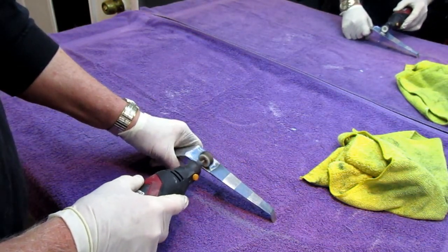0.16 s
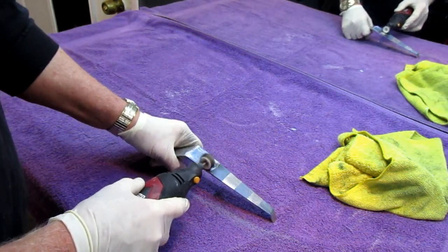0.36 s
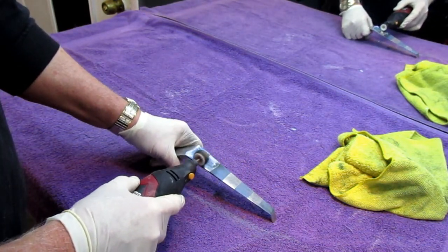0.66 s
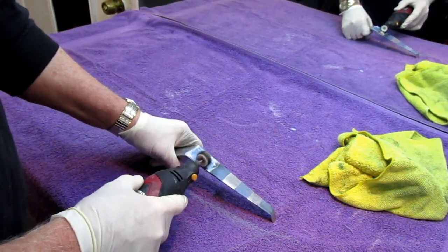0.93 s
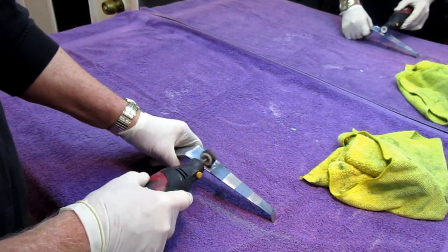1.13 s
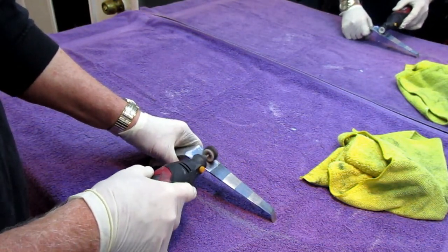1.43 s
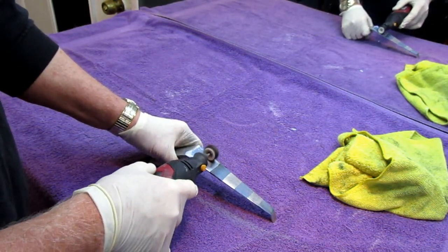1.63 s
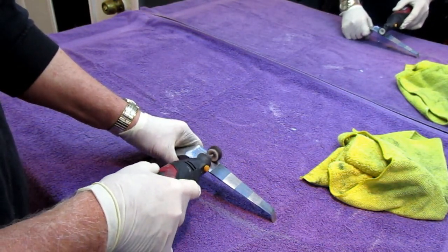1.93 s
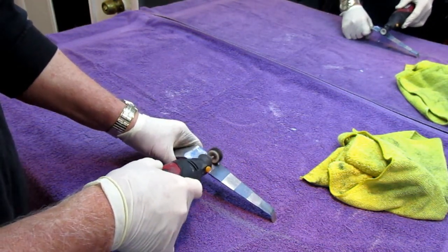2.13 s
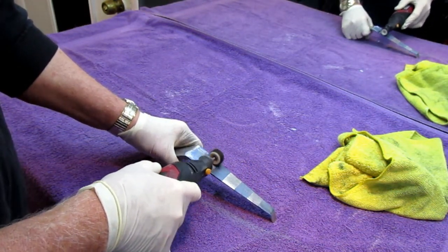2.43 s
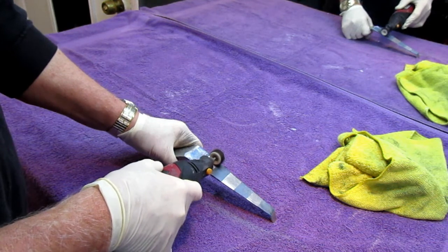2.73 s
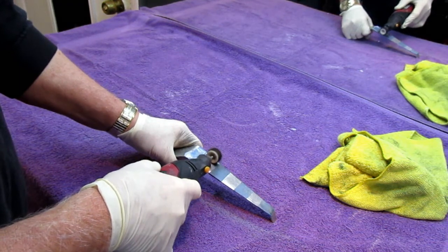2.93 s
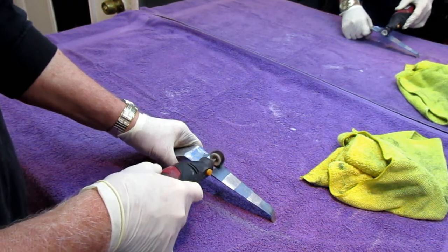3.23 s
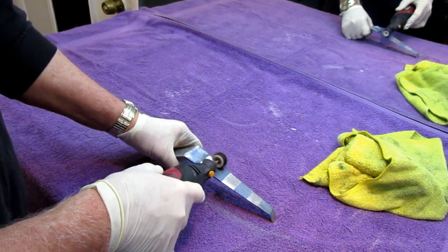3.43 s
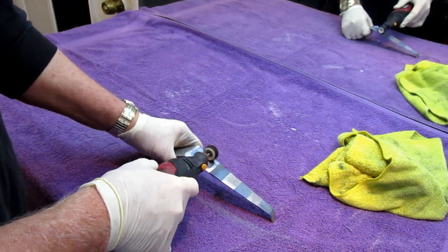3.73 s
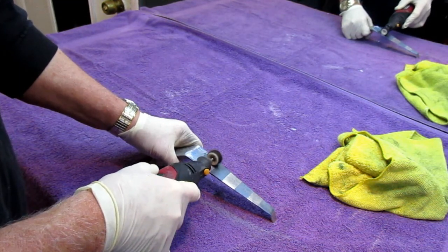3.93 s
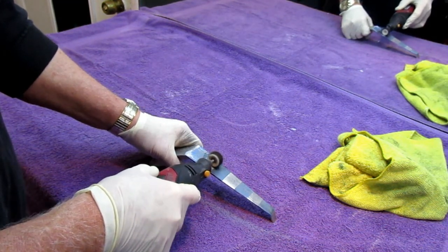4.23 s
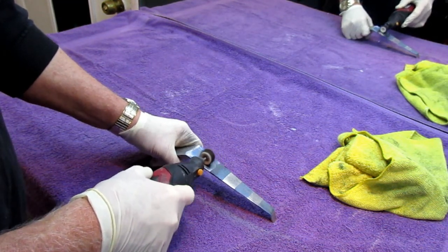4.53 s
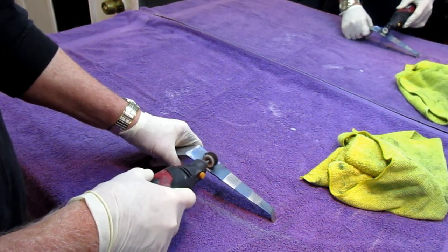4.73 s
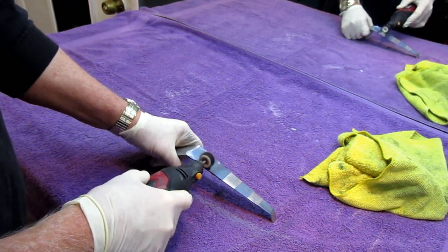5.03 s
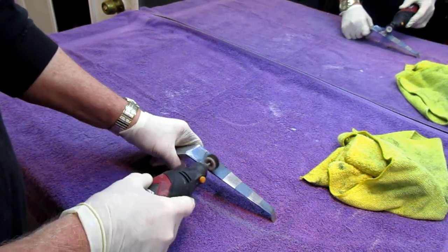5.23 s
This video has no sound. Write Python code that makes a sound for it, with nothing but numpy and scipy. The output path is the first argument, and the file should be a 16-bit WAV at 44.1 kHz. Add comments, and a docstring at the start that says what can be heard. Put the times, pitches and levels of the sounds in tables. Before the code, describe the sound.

A small handheld rotary tool whines steadily against a metal strip, growing louder and rougher, with quick pitch dips as each stroke presses in.

```python
"""Rotary tool buffing metal

A handheld rotary tool buffs a strip of metal on a towel-covered bench, close to a mono microphone.
Each of the hand's strokes, five or six a second, brakes the shaft. The slap of the bit once a turn and its
bounce every other turn are sums of sines locked to the running shaft phase; mains ripple adds a hum, and weak
lines lie near a few orders of the whine. Felt and fan hiss are coloured noise; the bench booms, rumbles and
knocks softly."""
import sys
import numpy as np
from scipy.fft import rfft, irfft, next_fast_len
from scipy.io import wavfile
from scipy.ndimage import uniform_filter1d, map_coordinates

SR = 44100
rng = np.random.default_rng(int(sys.argv[2]) if len(sys.argv) > 2 else 0)


def generate_wav(sig):
    """Save sig (samples, or channels by samples) to the path in sys.argv[1] as 16-bit PCM at SR."""
    pcm = np.round(np.clip(np.atleast_2d(sig).T, -1, 1) * 32767).astype(np.int16)
    wavfile.write(sys.argv[1], SR, pcm)


N = 236623
T = np.arange(N) / SR  # time in s
RIPPLE_HZ = 120  # mains ripple in the motor torque
TOP_HZ = 15100  # upper band limit
FULL_DB = -17  # the work counts as light below this level
SAG_SPREAD_S = 0.047  # spread of the bell-shaped speed sag
BITE_LEAD_S, BITE_SPREAD_S = 0.053, 0.026  # the bite comes before the deepest sag
HUM_DB, HUM_GROWTH = -43, -0.4  # dB against the work; dB gained per dB under FULL_DB
FELT_DB = -6  # against the work
BOOM_DB = -49  # steady shaking of the bench against the work, before the trims of its tone and noise
THUD_RISE_S, THUD_T60_S = 0.022, 0.47

# shaft speed between strokes, as the hand leans harder: start_s, speed_hz
SHAFT_DRIFT = [(0.0, 433.4), (0.5, 417.0), (0.7, 417), (1.05, 409.1), (1.45, 405.2), (1.7, 417.4),
               (1.8, 427.2), (1.95, 429), (2.05, 424.7), (2.38, 421.2), (2.55, 413), (3.05, 414.5),
               (3.5, 406.4), (4.25, 402.3), (4.65, 386.3), (5.17, 379.6), (5.29, 397.5), (5.37, 417.4)]
# each stroke bites, then brakes the shaft briefly: centre_s, sag_hz, bite_db
STROKES = [(0.129, 1.45, 0.3), (0.285, 1.8, 1), (0.488, 3.85, 0.5), (0.74, 1.1, -0.5), (0.84, 1.78, -0.7),
           (1.058, 5.1, -0.7), (1.282, 3.2, -1), (1.485, 1.58, 0.5), (1.62, 7.8, 1), (1.727, 11.5, -1),
           (1.845, 11.9, -1.1), (2.088, 2.36, -0.1), (2.271, 2.16, 0.7), (2.668, 1.69, 1),
           (2.822, 2.93, 0.8), (2.973, 4, 0.5), (3.133, 5.5, 0.4), (3.326, 5.9, 0), (3.5, 9.7, -0.5),
           (3.665, 7.1, 0), (3.869, 9.1, -1), (4.029, 9.8, -0.3), (4.178, 8.9, 0.5), (4.337, 11, 1.2),
           (4.524, 8.5, -0.1), (4.683, 7.6, 1.4), (4.845, 8.6, -1), (5.022, 5.56, -1), (5.204, 9.4, -0.3)]
# loudness of the work, which the layers of the tool follow: start_s, level_db, fan_db (against the work)
WORK_LEVEL = [(0.0, -26, -11.5), (0.35, -25.5, -8), (0.7, -22.5, -10.5), (0.9, -22, -9.5),
              (1.3, -19.5, -10.9), (1.6, -19.5, -11), (1.8, -16.5, -11.5), (2.1, -17.5, -11),
              (2.5, -15.5, -11), (3.05, -15.5, -10.5), (3.2, -17.5, -10), (3.7, -16, -9), (4.3, -16, -10),
              (4.9, -15.5, -11), (5.15, -14.5, -10), (5.37, -17.5, -9)]
# the bit leaves the metal: start_s, length_s, level_db
LIFTS = [(1.721, 0.06, -3), (1.887, 0.051, -6.5), (5.224, 0.05, -7)]
# the bit is off the metal and the orders from the ninth to the twenty-fourth fade: start_s, end_s, level_db
UPPER_FADES = [(1.725, 1.935, -7), (5.225, 5.4, -9)]

# a hand or the strip presses the table top: start_s, level_db (before the rise and the trims)
THUDS = [(.02, -57), (.76, -52), (.97, -56), (1.5, -62), (1.72, -54), (1.87, -45), (1.97, -56), (2.13, -46),
         (2.65, -43), (2.92, -59), (3.21, -53), (3.39, -47), (3.8, -57), (4.05, -55)]
# low rumble of the bench: start_s, level_db (mean of a random wobble)
RUMBLE = [(0, -70), (1.3, -68), (1.5, -59), (2.0, -57), (2.3, -63), (3.3, -68), (3.5, -59), (5.0, -60),
          (5.37, -57)]
# the strip shifts on the towel: start_s, level_db (of each of two tones)
KNOCKS = [(1.718, -41), (1.87, -42.5)]

# relative spectrum of the felt rub through strip and housing: frequency_hz, density_db (per Hz)
FELT_SPECTRUM = [(100, -32), (180, -30), (340, -15.5), (540, -14), (740, -4.5), (950, -9), (1200, -3),
                 (1370, -6), (1600, -2), (1900, 1.5), (2220, -4), (2900, -0.5), (3600, -8), (4300, -6),
                 (6500, -12.5), (12000, -66)]
# relative spectrum of the fan: frequency_hz, density_db (per Hz)
FAN_SPECTRUM = [(2350, -19), (4000, 0), (9450, -5), (11400, -13.5), (13200, -17.5), (14900, -22.5)]

# shaft speeds at which the bounce lines are mapped: speed_hz
BOUNCE_SPEEDS = (380, 396, 406, 414, 428)
# main lines of the every-other-turn bounce: order, five level_db (against the work, at BOUNCE_SPEEDS),
# growth (dB gained per dB under FULL_DB)
BOUNCE_LINES = [(0.5, -36.5, -37.0, -32.5, -32.5, -34.0, 0.58), (1.5, -26.5, -27, -21.5, -21.5, -35, 0.23),
                (2.5, -36, -39, -29, -28, -27.0, 0.17), (3.5, -27, -17.5, -22, -21.5, -22.5, 0.66),
                (4.5, -25.0, -18, -18.5, -19.5, -4.5, -0.28), (5.5, -31, -32, -35.5, -21, -16.5, 0.46),
                (6.5, -27, -29, -22, -17, -7, -0.44), (7.5, -17, -16, -25, -27, -17.0, -0.88)]
# other lines of the bounce: order, level_db (against the work)
OTHER_BOUNCE_LINES = [(8.5, -25), (14.5, -27)]
# strength of the bounce: start_s, level_db
BOUNCE_STRENGTH = [(0, -1), (1.5, 0), (1.57, -10), (1.63, -0.5), (1.72, 0), (1.78, -20), (2.15, -11),
                   (2.3, -11), (2.6, 0), (3.03, 0), (3.09, -14), (3.15, 0.5), (4.5, -0.5), (5.2, -2),
                   (5.26, -13), (5.37, -20)]
# ripple line one ripple step below the eighth order: columns as BOUNCE_LINES
RIPPLE_BELOW = (8, -11, -16, -13, -26, -37, -6.3)
# weak lines near the eighth, sixteenth and thirty-second orders, most set off by mains ripple:
# order, ripple_steps (of RIPPLE_HZ), level_db (against the work)
WEAK_LINES = [(8.02, -2, -21.5), (8.1, 1, -29), (15.5, 0.52, -32), (32, -1, -42), (32, 1, -43)]

# shaft speeds at which the orders are mapped: speed_hz
ORDER_SPEEDS = (376, 388, 398, 406, 414, 428)
# strip and housing favour each order at some speeds: order, six level_db (against the work, at ORDER_SPEEDS,
# before a trim per group), stroke_db (per Hz of sag about its mean), pull_db (at full speeding up),
# first_db and second_db (at unit first and second shift of colour)
SHAFT_ORDERS = [(1.0, -21, -21, -20, -15.0, -19.5, -11.5, 0.063, -0.6, 1, 0.0),
                (2.0, -18, -15, -16, -13, -15.5, -15.5, -0.21, 0.1, 0.7, 1.0),
                (3.0, -15.5, -22, -15.5, -22.5, -19.5, -19.5, -0.2, 0.5, -2, 8),
                (4.0, -15, -20.5, -10, -8.5, -9.5, -18.5, -0.084, -2, 1.8, 0.3),
                (5.0, -19.5, -13, -21, -15.5, -15.5, -16, 0.26, 0, -3, 1.5),
                (6.0, -13.5, -12.5, -18, -9, -10, -21, 0.17, 0.1, 7, 4.0),
                (7.0, -11.5, -10, -11.5, -12, -23, -16, -0.3, -2, -1.5, 1),
                (8.0, -14, -15.5, -12.5, -14.5, -16, -14.5, -0.035, -2.5, -5.5, -0.3),
                (9.0, -17, -21, -18.5, -24, -23.7, -26, -0.1, 0, 3, 1.6),
                (10.0, -31, -21, -17, -18, -19.5, -25, -0.03, -1, -5, 4),
                (11.0, -25.0, -15.5, -15.5, -18, -22, -22, -0.14, -1.3, 1.5, 1),
                (12.0, -30, -26, -20, -18, -29, -23, 0.17, 0.5, -8, 3.5),
                (13.0, -27.4, -38, -22, -20, -22.2, -25, 0.048, 2, 0.4, 1.7),
                (14.0, -31, -22.2, -37, -27, -18, -33, -0.35, 4, 5, 6),
                (15.0, -19.5, -15, -22.5, -22, -24, -26, 0.064, 1.5, -6, 1.5),
                (16.0, -20, -21, -21, -22.8, -20.5, -26, 0.2, -0.5, 3.5, -1.5),
                (17.0, -26, -21.5, -20.5, -22.7, -29, -22, 0.0, 4, -7, -2.5),
                (18.0, -36, -27.0, -33.9, -28, -28.5, -29, -0.0, -7.5, -0.7, 3.2),
                (24.0, -25, -19.5, -24, -30, -27.5, -28.1, 0.037, 1, 1, -4),
                (31.0, -43, -44.7, -48.5, -40.0, -41.2, -51.2, -0.1, -1.1, -3.7, 4.0),
                (32.0, -36.6, -42.5, -39.5, -36, -45.3, -52.7, 0.1, 2, -0.3, 3.9)]
# faint upper orders: order, level_db (against the fan level of WORK_LEVEL)
FAINT_ORDERS = [(19, -25), (20, -29), (21, -39), (22, -31), (23, -25), (25, -26), (26, -32), (27, -38),
                (28, -40), (30, -33), (33, -40)]
# the whine changes colour in two ways, likely as the tool is tilted and moved along the strip:
# start_s, first, second (both about -1 to 1, no unit)
COLOUR_SHIFT = [(0.0, 1.0, 0.29), (0.2, 0.78, 0.42), (0.45, 0.37, -0.12), (0.65, 0.4, -0.49),
                (0.85, 0.66, -1.1), (1.05, 0.42, -0.98), (1.35, 0.02, -0.74), (1.6, 0.23, 0.26),
                (1.72, -0.062, 0.39), (1.8, -0.95, -0.22), (1.97, -0.61, 0.26), (2.3, -0.42, -0.022),
                (2.55, -0.46, 0.18), (3.1, -0.37, 0.47), (3.5, 0.096, 0.38), (4.2, 0.066, 0.38),
                (4.6, -0.25, 0.35), (4.9, -0.2, -0.048), (5.2, -0.45, -0.2), (5.37, -0.79, -0.64)]
# the first order breaks up while the touch is light, then firms: start_s, level_db (added to its row)
FIRST_ORDER = [(0, -9), (.2, -7.5), (.27, -23), (.33, -2), (.4, -12), (.47, 3), (.56, -16), (.75, -12),
               (.82, -1), (1.05, 0), (1.7, 0), (2.0, 2.5), (5.1, 0), (5.2, 5), (5.37, 4.5)]


def amp(db):
    """Decibel law: 20 dB is a factor of ten in amplitude."""
    return 10 ** (np.asarray(db) / 20)


def unit(x):
    """Normalisation to an rms of 1."""
    return x / np.sqrt(np.mean(x ** 2) + 1e-20)


def curves(rows):
    """Linear interpolation: one value per sample for each column after the time."""
    s, *cols = np.transpose(rows)
    return [np.interp(T, s, c) for c in cols]


def wobble(rate):
    """Smooth random fluctuation: a spline through random knots, rate knots a second."""
    coarse = T[::32]
    knots = rng.standard_normal(int(N * rate / SR) + 4)
    return np.interp(T, coarse, map_coordinates(knots, [coarse * rate]))


def bumps(times, heights, width_s):
    """Superposition of bell-shaped swells."""
    coarse = T[::32]
    bells = np.exp(-0.5 * ((coarse - times[:, None]) / width_s) ** 2)
    return np.interp(T, coarse, heights @ bells)


def filtered(x, response):
    """Linear filtering: the spectrum is multiplied by a response of frequency."""
    m = next_fast_len(N + SR // 2)
    return irfft(rfft(x, m) * response(np.fft.rfftfreq(m, 1 / SR)), m)[..., :N]


def coloured(x, spectrum):
    """Spectral shaping by points in Hz and dB, joined on a log frequency axis; rms 1."""
    f, db = np.transpose(spectrum)
    return unit(filtered(x, lambda hz: amp(np.interp(np.log(hz + 1), np.log(f + 1), db))))


def tone(turns, blur):
    """Phase modulation: a sine of rms 1 on a running phase, with blur rad of slow unrest."""
    return np.sqrt(2) * np.sin(2 * np.pi * (turns + rng.random()) + blur * wobble(40))


def drift():
    """Mean load sets the shaft speed in Hz between strokes."""
    return curves(SHAFT_DRIFT)[0]


def sag():
    """Friction brakes the shaft: Hz lost to the strokes."""
    s, hz, _ = np.transpose(STROKES)
    return bumps(s, hz, SAG_SPREAD_S)


def work():
    """Contact force sets the level: work in dB with each bite, and dB under full without it."""
    work_db = curves(WORK_LEVEL)[0]
    s, _, bite_db = np.transpose(STROKES)
    light_db = np.clip(FULL_DB - work_db, 0, None)
    return work_db + bumps(s - BITE_LEAD_S, bite_db, BITE_SPREAD_S), light_db


def contact():
    """Loss of contact lowers the slap: dB change while the bit is off the metal."""
    lifted_db = sum(db * (T > s) * (T < s + length) for s, length, db in LIFTS)
    return uniform_filter1d(lifted_db, size=300)


def upper_fade():
    """Loss of contact dulls the tone: dB change of the ninth to twenty-fourth orders, bit off the metal."""
    fade_db = sum(db * (T > start) * (T < end) for start, end, db in UPPER_FADES)
    return uniform_filter1d(fade_db, size=400)


def line_db(row, work_db, light_db):
    """Resonance makes the level of a line depend on shaft speed as well as on the work."""
    return work_db + np.interp(drift(), BOUNCE_SPEEDS, row[1:6]) + row[6] * light_db


def bench():
    """Forced and decaying vibration: the table top booms and rumbles; shifts of the strip knock dully."""
    work_db, _ = work()
    thuds, knocks = np.array(THUDS), np.array(KNOCKS)
    since = np.clip(T - thuds[:, :1], 0, None)
    decay = amp(thuds[:, 1:] - 60 * since / THUD_T60_S)
    rise = 1 - np.exp(-since / THUD_RISE_S)
    boom = amp(work_db + BOOM_DB) + (decay * rise).sum(axis=0)
    boom_tone = boom * amp(-0.5) * tone(48 * T, blur=0.65)
    low_spectrum = [(12, -36), (28, -20), (50, 4), (70, -25)]  # Hz, dB
    boom_noise = boom * amp(1) * coloured(rng.standard_normal(N), low_spectrum)

    rumble_spectrum = [(50, -30), (68, 5), (100, -8), (150, -2), (200, -44)]  # Hz, dB
    rumble_gain = amp(curves(RUMBLE)[0] + 1.5 * wobble(3.9))
    rumble = rumble_gain * coloured(rng.standard_normal(N), rumble_spectrum)

    after = T - knocks[:, :1]
    dying = amp(knocks[:, 1:] - 60 * np.abs(after) / 0.17) * (after > 0)  # 60 dB in 0.17 s
    knock = tone(235 * T, blur=0.89) + tone(290 * T, blur=0.81)
    return boom_tone + boom_noise + rumble + dying.sum(axis=0) * knock


def hiss(turns, pull):
    """Broadband noise modulated by rotation: felt and fan swell once a turn; the top flickers on its own."""
    work_db, _ = work()
    beat = np.cos(2 * np.pi * turns)
    felt_source = (1 + 0.28 * beat) * amp(0.63 * wobble(20)) * rng.standard_normal(N)
    felt = coloured(felt_source, FELT_SPECTRUM)
    fan_source = (1 + 0.19 * beat) * amp(0.65 * wobble(14)) * rng.standard_normal(N)
    fan = coloured(fan_source, FAN_SPECTRUM)
    top = filtered(fan, lambda hz: 1 / (1 + (11500 / (hz + 1)) ** 12))
    flicker = amp(1.8 * wobble(11)) - 1
    felt_db = work_db + FELT_DB - 0.5 * pull + 0.11 * contact()
    fan_db = work_db + curves(WORK_LEVEL)[1] - 0.37 * pull + 0.18 * contact()
    return amp(felt_db) * felt + amp(fan_db) * (fan + flicker * top)


def bounce(turns):
    """Period doubling: a bounce every other turn puts lines halfway between the shaft orders."""
    work_db, light_db = work()
    bounce_db, = curves(BOUNCE_STRENGTH)
    lines = 0
    for row in BOUNCE_LINES:
        level_db = bounce_db + line_db(row, work_db, light_db) + 1.4 * wobble(12)
        order = round(2 * row[0]) / 2  # an exact half keeps the line locked to the shaft
        lines = lines + amp(level_db) * tone(order * turns, blur=0.25 * row[0] ** 0.3)
    for order, db in OTHER_BOUNCE_LINES:
        level_db = bounce_db + work_db + db + 1.7 * wobble(13.0)
        lines = lines + amp(level_db) * tone(order * turns, blur=0.37)
    return lines


def hum_and_weak_lines(turns, pull):
    """Torque modulation: mains ripple gives a hum and sets off most of the weak lines near a few orders."""
    work_db, light_db = work()
    below_db = line_db(RIPPLE_BELOW, work_db, light_db) + 1.5 * wobble(12)
    below = amp(below_db) * tone(8 * turns - RIPPLE_HZ * T, blur=0.2)
    weak = sum(amp(work_db + db + 3.5 * wobble(6)) * tone(order * turns + step * RIPPLE_HZ * T, blur=0.45)
               for order, step, db in WEAK_LINES)
    hum_db = work_db + HUM_DB + HUM_GROWTH * light_db
    hum = amp(hum_db + 1.8 * pull + 2.2 * wobble(9.9)) * tone(RIPPLE_HZ * T, blur=0.1)
    overtone = amp(hum_db - 2 + 2.5 * wobble(8.6)) * tone(2 * RIPPLE_HZ * T, blur=0.1)
    return below + weak + hum + overtone


def whine(turns, pull):
    """Harmonics of rotation: shaft orders follow strokes and colour shifts; the faint ones come and go."""
    work_db, _ = work()
    sag_hz = sag()
    first, second = curves(COLOUR_SHIFT)
    speed_hz = drift() - sag_hz
    stroke_hz = sag_hz - sag_hz.mean()
    slap_db = work_db + contact()
    low = bright = glints = 0
    for order, *map_db, stroke_db, pull_db, first_db, second_db in SHAFT_ORDERS:
        order = round(order)
        level_db = slap_db + np.interp(speed_hz, ORDER_SPEEDS, map_db)
        level_db = level_db + stroke_db * stroke_hz + pull_db * pull
        level_db = level_db + first_db * first + second_db * second
        if order == 1:
            level_db = level_db + curves(FIRST_ORDER)[0]
        if order <= 8:
            low = low + amp(level_db + 1.5 + 1.68 * wobble(18)) * tone(order * turns, blur=0.29)
        elif order < 30:
            bright = bright + amp(level_db + 1.0 + 1.92 * wobble(14)) * tone(order * turns, blur=0.61)
        else:
            glints = glints + amp(level_db + 1.5 + 4.5 * wobble(14)) * tone(order * turns, blur=0.55)
    faint_db = work_db + curves(WORK_LEVEL)[1]
    faint = sum(amp(faint_db + db + 3.4 * wobble(8.1)) * tone(order * turns, blur=0.82)
                for order, db in FAINT_ORDERS)
    return low + amp(upper_fade()) * bright + glints + faint  # the faint orders do not fade


def scene():
    """Superposition: all sources add at one microphone, written to both channels."""
    speed_hz = drift() - sag()
    turns = np.cumsum(speed_hz) / SR
    acceleration = uniform_filter1d(np.gradient(speed_hz) * SR, size=1500)  # Hz per s
    pull = np.tanh(acceleration / 60)  # towards +1 speeding up, -1 braked
    background = bench() + hiss(turns, pull) + hum_and_weak_lines(turns, pull)
    mono = background + bounce(turns) + whine(turns, pull)
    return np.array([mono, mono])


def record(dry):
    """Band limiting: nothing at or above TOP_HZ passes."""
    return filtered(dry, lambda hz: hz < TOP_HZ)


dry = scene()
out = record(dry)
generate_wav(out)
```